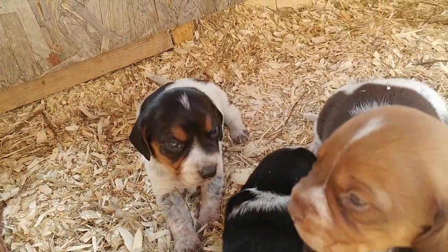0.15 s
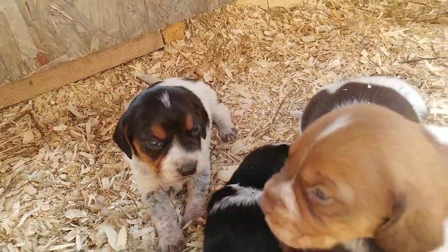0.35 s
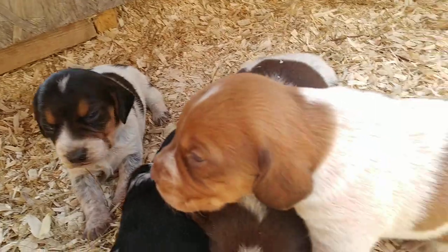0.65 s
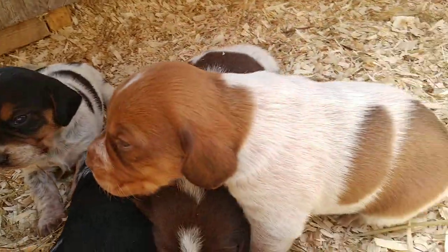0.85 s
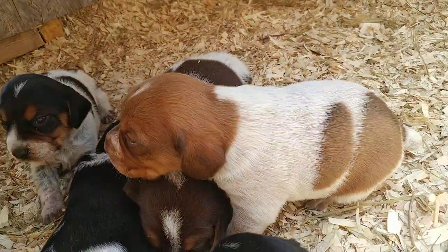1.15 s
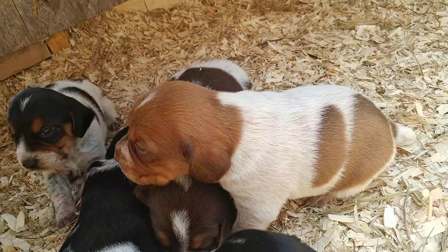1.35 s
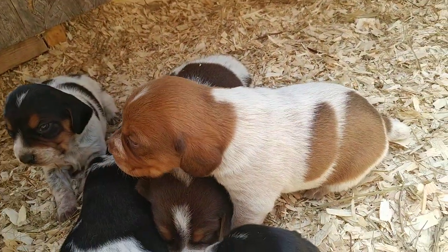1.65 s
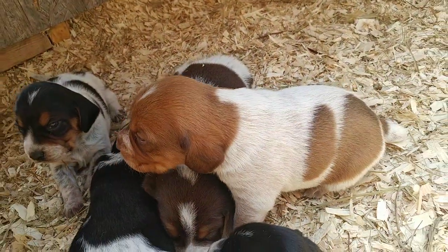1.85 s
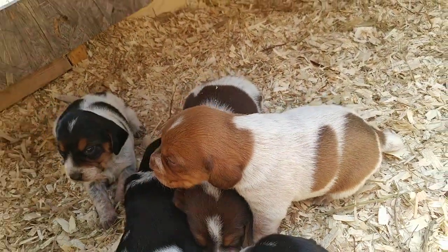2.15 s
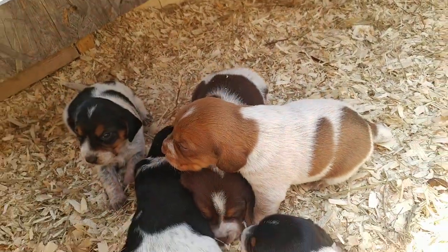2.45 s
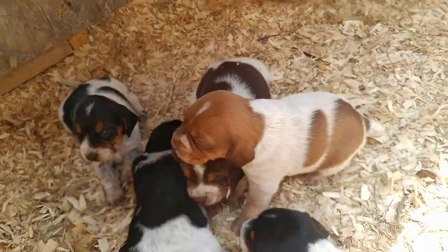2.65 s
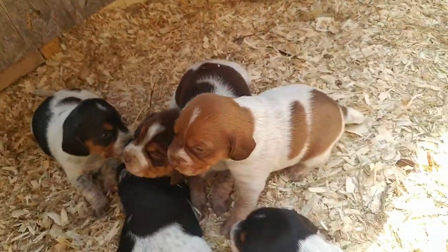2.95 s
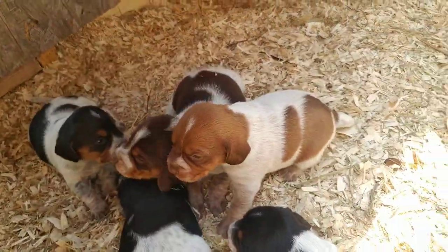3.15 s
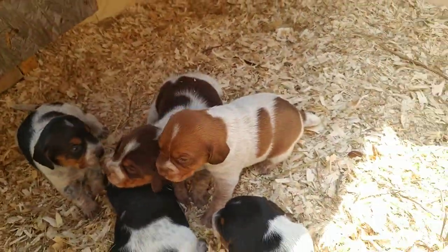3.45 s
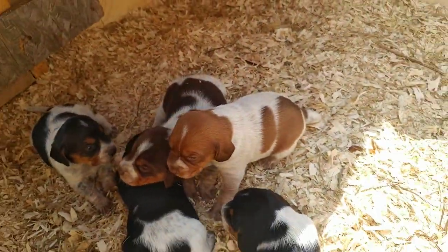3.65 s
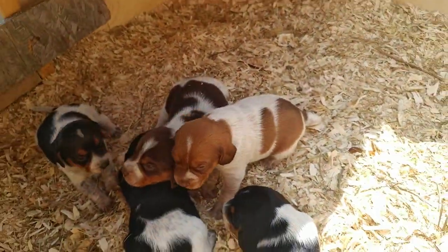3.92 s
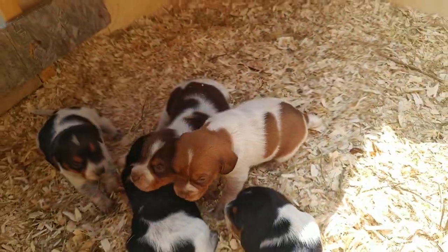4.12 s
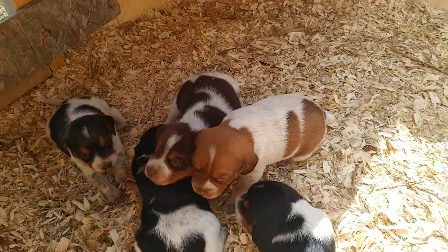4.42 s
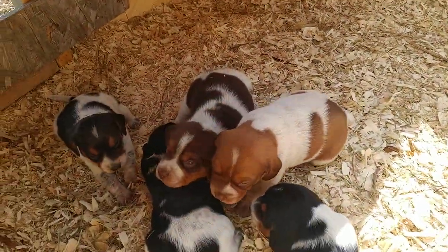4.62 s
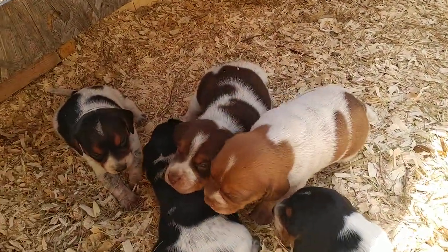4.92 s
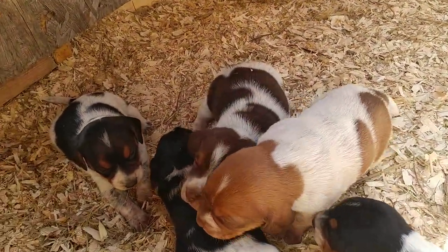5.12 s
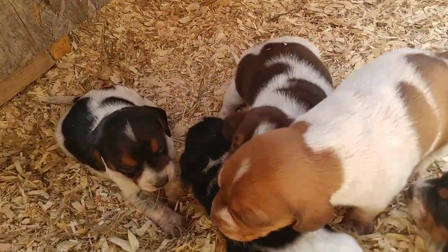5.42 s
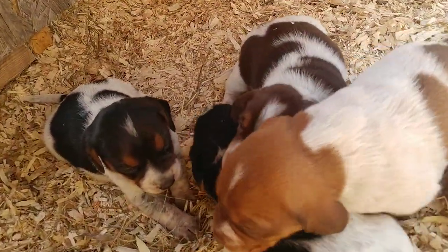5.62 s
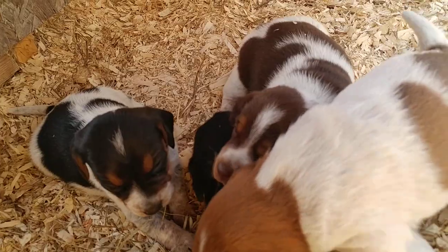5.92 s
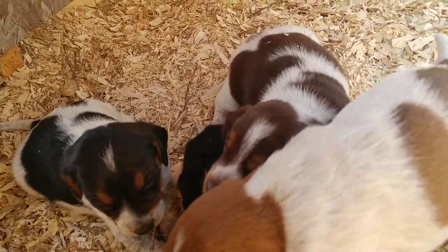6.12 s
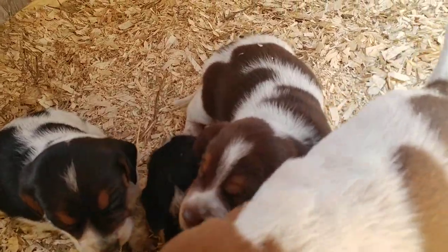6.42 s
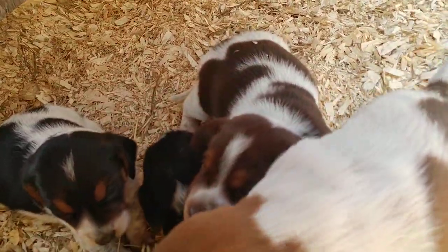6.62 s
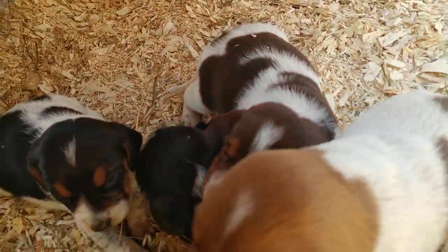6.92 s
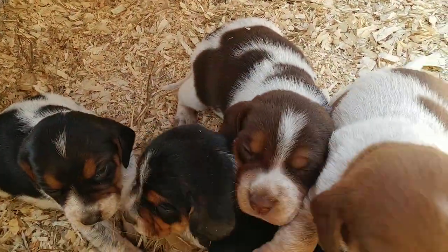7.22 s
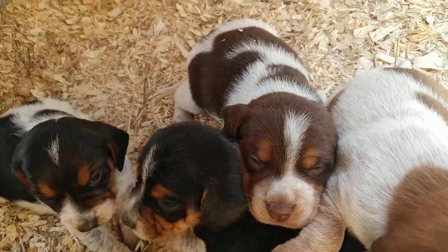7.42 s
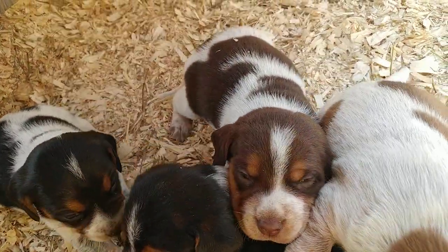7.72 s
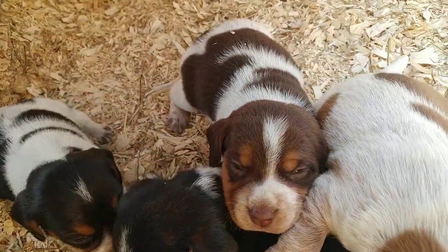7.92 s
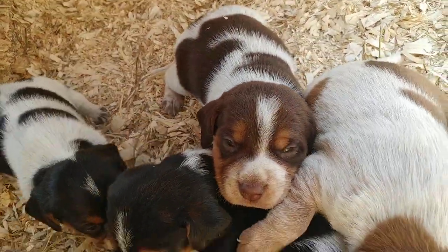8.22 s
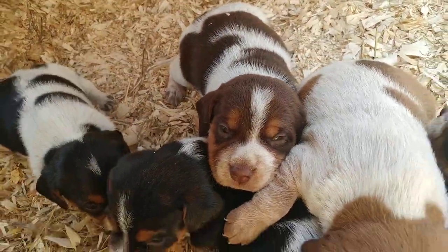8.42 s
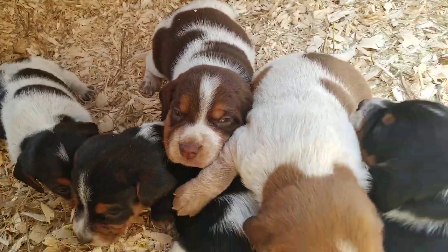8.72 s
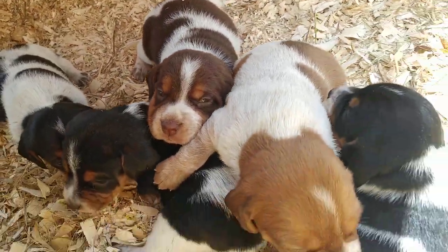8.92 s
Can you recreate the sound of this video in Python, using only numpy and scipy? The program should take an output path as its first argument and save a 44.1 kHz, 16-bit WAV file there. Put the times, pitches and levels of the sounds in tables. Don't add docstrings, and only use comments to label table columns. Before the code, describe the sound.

Small paws crunch and drag through dry, curly shavings in uneven strokes with little gaps, single curls cracking sharply and the pressed bedding crunching lower beneath. Bodies softly knock the wooden floor and walls. After a quieter stretch comes the heaviest scuffling and booming, mixed with high puppy whistles and mutters, then a few short yips and near stillness. Near, dry stereo pickup in a small box with faint hiss.

```python
import sys
import numpy as np
from scipy import signal
from scipy.fft import rfft, irfft, next_fast_len
from scipy.io import wavfile
from scipy.ndimage import uniform_filter1d, map_coordinates

SR = 44100
rng = np.random.default_rng(int(sys.argv[2]) if len(sys.argv) > 2 else 0)


def store_wav(level_fs):
    pcm = np.round(np.clip(np.atleast_2d(level_fs), -1, 1) * 32767)
    wavfile.write(sys.argv[1], SR, pcm.T.astype(np.int16))


def level_to_linear(level):
    exponent = np.asarray(level, float) / 20
    return 10 ** exponent


N = 399490

# start_s, length_s, first_db, last_db, bed_weight_db
PAW_LANDINGS = [(0.011, 0.046, -31.5, -29.5, -30.5), (0.329, 0.085, -51, -47.5, -40.5),
                (0.706, 0.041, -51.5, -53.5, -40), (0.764, 0.055, -46, -46.5, -39),
                (1.228, 0.025, -37, -33, -37), (1.294, 0.047, -35, -49.5, -36.5),
                (1.453, 0.055, -27.5, -30, -27), (1.586, 0.021, -27, -58, -29.5),
                (1.919, 0.067, -24, -29, -27), (2.153, 0.082, -33, -69, -39), (2.455, 0.035, -42, -44, -40),
                (2.596, 0.089, -31, -89.5, -48.5), (2.993, 0.02, -50, -49, -46),
                (3.28, 0.024, -34.5, -52.5, -40), (3.374, 0.07, -31.5, -24.5, -32),
                (3.686, 0.029, -67.5, -52, -56.5), (3.795, 0.0077, -25.5, -44, -49),
                (4.059, 0.075, -42, -36, -45.5), (4.193, 0.035, -24.5, -47, -39),
                (4.476, 0.049, -30.5, -48.5, -39.5), (4.672, 0.082, -36.5, -35.5, -36),
                (5.299, 0.049, -43, -31, -40), (5.616, 0.088, -37.5, -25, -37.5),
                (6.018, 0.012, -27, -23.5, -33), (6.032, 0.076, -15.5, -19, -21.5),
                (6.164, 0.088, -17.5, -22.5, -23.5), (6.539, 0.045, -35, -34, -37.5),
                (6.591, 0.041, -24, -17.5, -26), (6.757, 0.1, -16, -12, -26.5),
                (7.028, 0.038, -13, -42.5, -25), (7.222, 0.046, -53, -50, -47)]
# start_s, length_s, level_db, rise_s (per 30 dB), bed_weight_db
LIMB_DRAGS = [(0.19, 0.075, -39.5, 0.07, -35), (0.438, 0.095, -36, 0.08, -30),
              (1.05, 0.08, -19.5, 0.12, -18.5), (1.404, 0.008, -31, 0.04, -30),
              (2.09, 0.028, -35, 0.06, -32), (2.297, 0.016, -21, 0.03, -30), (2.74, 0.043, -36, 0.07, -33),
              (2.872, 0.008, -33, 0.03, -31), (3.04, 0.065, -36, 0.035, -36), (3.14, 0.05, -42, 0.08, -36),
              (3.5, 0.065, -28, 0.11, -32.5), (3.845, 0.12, -38.5, 0.05, -39), (4.3, 0.03, -25, 0.06, -38),
              (5.345, 0.105, -25.5, 0.03, -29), (6.272, 0.063, -27, 0.04, -29),
              (6.355, 0.08, -18.5, 0.09, -29), (7.295, 0.13, -25, 0.045, -33),
              (7.45, 0.09, -17, 0.05, -28.5), (7.58, 0.05, -52, 0.03, -52)]
# start_s, length_s, level_db, bed_weight_db
WEIGHT_SHIFTS = [(0.595, 0.0048, -41.5, -43), (2.274, 0.044, -29.5, -34), (4.997, 0.084, -50.5, -48),
                 (5.124, 0.039, -50.5, -41.5), (5.827, 0.099, -43.5, -41), (5.945, 0.063, -48.5, -47),
                 (6.651, 0.017, -30, -32), (7.85, 0.035, -56, -58.5), (6.48, 0.041, -47.5, -40.5),
                 (6.88, 0.03, -26.5, -37), (7.72, 0.18, -56.5, -60.5), (8.079, 0.038, -59.5, -60),
                 (8.398, 0.078, -58.5, -59), (8.776, 0.37, -61.5, -49.5)]
# time_s, level_db
CREEP = [(0, -52), (1.7, -61), (2.4, -52), (3.3, -56), (4.8, -53), (5.55, -60), (7.1, -52), (7.7, -62),
         (9.06, -68)]
# time_s, dryness_db (above 7 kHz), depth_db (below 450 Hz), body_db (below 3 kHz)
LITTER_COLOUR = [(0.0, -3.5, -3, -1.5), (0.6, -7, -8, -0.5), (1.1, 0, -2, 0.5), (1.5, -2.5, 4, 1.5),
                 (2.0, 1.5, 4.5, 0), (2.3, -4, 3, 2), (2.8, 2.5, 6, -1.5), (3.3, -1, 4.5, -1),
                 (3.8, -1.5, 2, 0), (4.3, -1.5, 8, 1.5), (4.8, 4.5, 6, 3), (5.3, 4, -10.5, 1.5),
                 (5.8, 5, -1, -3), (6.3, 0.2, -2, -0.5), (7.0, 6.5, 9.5, -1.5), (7.5, 2.5, -8, -2),
                 (7.8, 18, -2, -3), (9.0, 2.5, 0, -0.5)]
# time_s, left_lag_samples
BEARING = [(0, -6), (1, -10), (1.8, -18), (2.6, -1), (3.5, -20.5), (4.2, 6.5), (5.2, 10), (5.8, 6),
           (6.2, -19), (6.8, -10), (7.6, -12.5), (8.5, 8.5)]
# frequency_hz, level_db
CURL_SPECTRUM = [(500, -33), (1000, -6), (1600, -5.5), (3000, -0.6), (4500, 1.2), (6000, -1.2), (8000, 1.5),
                 (12000, -4), (16000, -12)]
# frequency_hz, level_db
BED_SPECTRUM = [(200, -17), (270, -10), (350, -4), (440, -8), (560, 0), (650, -1.5), (860, -4), (1050, -15),
                (1500, -35)]
# time_s, level_db
FLOOR_LOAD = [(0.0, -37), (1.5, -33.5), (1.82, -50), (1.92, -29), (2.5, -39), (5.35, -44.5), (5.55, -55.5),
              (5.63, -37.5), (5.98, -36), (6.05, -19.5), (6.55, -30), (6.68, -19.5), (7.1, -18.5),
              (7.25, -30.5), (7.7, -51), (9.05, -56.5)]
# frequency_hz, width_hz, level_db
FLOOR_MODES = [(55.6, 11, -3.5), (70.4, 7.7, 0), (90.3, 18.4, -1.5)]
# frequency_hz, width_hz, level_db
UPPER_MODES = [(165, 16.4, 4), (213, 42, -2.5)]
# start_s, peak_db, ring_hz
THIN_CRACKS = [(0.4399, -18, 3700), (0.5959, -31, 4540), (0.7602, -39, 5870), (1.025, -13, 2930),
               (1.2294, -26, 3210), (1.401, -15.5, 4260), (1.47, -16.5, 4480), (1.923, -15.5, 4560),
               (2.076, -18, 4370), (2.2943, -7.5, 2730), (2.4534, -32, 3850), (2.742, -19, 7860),
               (2.8699, -17, 7270), (2.9916, -42, 7670), (3.178, -25, 2490), (3.2206, -30, 2490),
               (3.4261, -11, 3200), (3.4979, -15, 7300), (4.0094, -44, 3140), (4.0228, -36, 4360),
               (4.088, -22, 1800), (4.1139, -26, 3890), (4.278, -18, 3800), (4.6917, -23, 1880),
               (5.3128, -24, 2400), (5.343, -15, 4320), (5.654, -10, 7160), (5.8311, -29, 5100),
               (6.594, -11.5, 3590), (6.6168, -7.5, 3700), (6.6644, -18.5, 2140), (6.7385, -15, 5940),
               (6.759, -7, 3400), (7.4181, -9, 3600), (7.4669, -3.5, 7570)]
# start_s, peak_db, ring_hz, knock_db
THICK_SNAPS = [(0.502, -23, 3600, -26.5), (1.296, -19, 3330, -14), (1.4086, -6.5, 4310, -18.5),
               (1.452, -17, 4240, -25), (1.5774, -15, 4480, -1), (1.908, -25.5, 4500, -1),
               (2.0925, -14, 2750, -5.5), (2.157, -17.5, 4410, -19), (2.2628, -28, 2730, -10),
               (2.3089, -0.5, 3670, -23), (2.591, -11.5, 5100, -10.5), (2.778, -14.5, 4420, -9),
               (3.0955, -7, 3640, -27.5), (3.273, -30.5, 5080, -6), (3.376, -17, 3290, -23),
               (3.7913, -19.5, 1600, -16), (4.1939, -10.5, 7930, -12), (4.2982, -10, 4080, -25),
               (4.4767, -17, 1540, -12.5), (4.673, -30, 1400, 5), (5.6168, -12.5, 1740, -11.5),
               (5.67, -9.5, 7070, -27), (6.0185, -11.5, 7500, -21.5), (6.0322, -7, 3010, -25),
               (6.156, -8, 4100, -12.5), (6.238, -6, 2430, -23), (6.5425, -18.5, 5140, -25.5),
               (6.7507, -15.5, 7700, -3.5), (7.0282, -4, 7820, -10.5), (7.4375, -8.5, 3160, -13.5)]
# start_s, peak_db, pitch_hz
WALL_TAPS = [(1.097, -26.5, 165), (1.519, -24, 165), (1.901, -26, 159.4), (3.687, -30, 169),
             (4.481, -34.5, 169), (4.666, -24, 172), (6.415, -21.5, 174), (6.614, -14.5, 210),
             (7.028, -12, 347)]
# start_s, peak_db
FLOOR_BUMPS = [(1.148, -13.5), (1.419, -17), (1.518, -15.5), (1.918, -18.5), (3.178, -24.5), (3.395, -19),
               (4.204, -20), (4.662, -24.5), (6.036, -9), (6.165, -2.5), (6.652, -11.5), (6.881, -3),
               (7.033, 3.5)]
# time_s, pitch_hz, level_db
YIPS = [
    [(5.878, 1106, -45), (5.886, 1230, -29), (5.894, 1258, -32), (5.906, 1140, -23), (5.916, 980, -32),
     (5.93, 940, -46)],
    [(7.567, 922, -28), (7.573, 843, -21), (7.609, 747, -19.5), (7.616, 837, -20.5), (7.626, 880, -17.5),
     (7.632, 873, -38.5), (7.655, 880, -51)],
    [(7.833, 1150, -26), (7.839, 851, -24), (7.87, 842, -19.5), (7.879, 875, -17.5), (7.889, 881, -38.5),
     (7.91, 866, -50)],
    [(8.047, 910, -55), (8.054, 856, -32.5), (8.059, 700, -28.5), (8.063, 640, -25), (8.071, 612, -26.5),
     (8.075, 592, -36), (8.09, 586, -64)],
]
# time_s, pitch_hz, level_db
MUTTERS = [
    [(6.065, 635, -26.5), (6.09, 627, -26.5), (6.105, 620, -22.5)],
    [(6.1, 890, -25.5), (6.112, 1000, -25.5), (6.13, 983, -29.5), (6.148, 830, -29.5)],
]
# time_s, pitch_hz, level_db, overtones_db
WHISTLES = [
    [(6.57, 1008, -24, -12), (6.59, 1260, -39, -8), (6.625, 1314, -40, -4), (6.655, 1276, -39, -8),
     (6.67, 1044, -23.5, -15.5)],
    [(6.885, 1425, -45.5, 3), (6.91, 1507, -32, 2), (6.95, 1700, -35.5, 1), (6.965, 1723, -28, -3),
     (6.985, 1620, -30, -4), (7.003, 1690, -31, -5), (7.03, 1604, -29.5, -5)],
    [(7.218, 1380, -45.5, 2.5), (7.232, 1304, -36.5, 1.5), (7.25, 1296, -34, 1.5), (7.28, 1503, -32.5, 2),
     (7.315, 1682, -23, -1), (7.335, 1630, -27.5, -5), (7.36, 1483, -28.5, -4), (7.385, 1232, -28, -6.5),
     (7.4, 975, -36, -9)],
]
# frequency_hz, level_db
MOUTH = [(600, 2), (900, -4), (1300, -15), (1800, -13), (2500, -26), (3500, -55), (5200, -33), (7000, -27),
         (10000, -23)]
# frequency_hz, level_db
NOSE = [(900, -2.5), (1800, -7.5), (2600, -12), (3400, -23), (5000, -17), (6700, -10), (8500, -8.5),
        (10500, -12), (13000, -35)]
# frequency_hz, t60_s
BOX_DECAY = [(300, 0.029), (2000, 0.061), (10000, 0.0043)]
# frequency_hz, level_db
LEFT_PORT = [(300, 1.5), (2000, 1), (6000, -1.5), (8450, -8), (8900, -17), (9450, -4), (10600, 3),
             (12500, -7), (16000, -11.5)]
# frequency_hz, level_db
RIGHT_PORT = [(300, -1), (2000, 0), (6000, 0), (8350, -5), (8900, -31.5), (10400, -16), (12500, -23.5),
              (16000, -22.5)]
# frequency_hz, level_db (per Hz)
AIR_SPECTRUM = [(24, -35.5), (40, -3), (101, 1), (185, -11), (243, -27), (570, -17.5), (2500, -35),
                (3300, -39), (5310, -41.5), (7730, -26.5), (8990, -18.5), (10400, -8.5), (16000, -21)]


def unit(x):
    return x / np.sqrt(np.mean(x ** 2) + 1e-20)


def along(points, hz):
    f, v = np.transpose(points)
    return np.interp(np.log(hz + 1), np.log(f + 1), v)


def curves(rows):
    s, *cols = np.transpose(rows)
    return [np.interp(np.arange(N) / SR, s, c) for c in cols]


def wobble(rate):
    n = np.arange(0, N + 16, 16)
    knots = rng.standard_normal(int(N * rate / SR) + 4)
    return np.interp(np.arange(N), n, map_coordinates(knots, [n * rate / SR]))


def filtered(x, response):
    m = next_fast_len(N + SR // 6)
    return irfft(rfft(x, m) * response(np.fft.rfftfreq(m, 1 / SR)), m)[..., :N]


def coloured(x, spectrum):
    return filtered(x, lambda hz: level_to_linear(along(spectrum, hz)))


def shaded(x, band, db):
    return x + (level_to_linear(db) - 1) * filtered(x, band)


def arriving(x, lag):
    n = np.arange(N)
    late = np.clip(n - np.round(lag).astype(int), 0, N - 1)
    return np.array([x[late], x])


def strokes_db(rows, rest_db):
    settle_db, settle_s = -30, 0.16
    t = np.arange(0, N, 32) / SR
    power = level_to_linear(2 * rest_db(t))
    for s, length, first_db, last_db, rise, fall in rows:
        end = s + length
        times = [s - 2 * rise, s, end, end + 2 * fall]
        stroke_db = np.interp(t, times, [first_db - 60, first_db, last_db, last_db - 60])
        settling_db = max(first_db, last_db) + settle_db
        power = power + level_to_linear(2 * stroke_db)
        power = power + (t > s) * level_to_linear(2 * settling_db - 60 * np.clip(t - end, 0, 9) / settle_s)
    return np.interp(np.arange(N) / SR, t, 10 * np.log10(power))


def paw_work():
    rows = [(s, n, a, b, 0.003, 0.049, w) for s, n, a, b, w in PAW_LANDINGS]
    rows += [(s, n, a, a, min(rise, 0.13), 0.045, w) for s, n, a, rise, w in LIMB_DRAGS]
    rows += [(s, n, a, a, 0.047, 0.032, w) for s, n, a, w in WEIGHT_SHIFTS]
    crush_db = strokes_db([row[:6] for row in rows], lambda t: np.interp(t, *np.transpose(CREEP)) - 6)
    pressed = [(s, n, w, w + 0.44 * (b - a), 1.42 * rise, 1.55 * fall) for s, n, a, b, rise, fall, w in rows]
    press_db = strokes_db(pressed, lambda t: -64 + 0 * t)
    return crush_db, press_db


def crackle(spiky_db, patchy_db):
    sizes_db = spiky_db * uniform_filter1d(rng.exponential(1, N), size=6)
    breaks = rng.standard_normal(N) * level_to_linear(sizes_db)
    z = signal.stft(breaks, nperseg=256)[2]
    field = uniform_filter1d(rng.standard_normal(z.shape), size=3, axis=0)
    field = uniform_filter1d(field, size=12, axis=1)
    return signal.istft(z * level_to_linear(patchy_db * unit(field)), nperseg=256)[1][:N]


def ticks(count, hz, cycles, spread_db):
    size, place, side = rng.random((3, count, 1))
    t = np.arange(128) / SR
    pitch = hz * np.exp(0.39 * rng.standard_normal((count, 1)))
    tones = np.exp(-t * pitch / cycles) * np.sin(2 * np.pi * np.clip(pitch, 2200, 15000) * t)
    tones = level_to_linear(np.minimum(-spread_db * np.log(size), 10)) * tones
    start = (place * N).astype(int) + np.arange(128)
    lag = np.interp(place * N / SR, *np.transpose(BEARING)) + 30 * (side - .5)
    ports = []
    for delay in (lag.astype(int), 0):
        heard = np.bincount((start + 64 + delay).ravel(), tones.ravel(), N + 512)
        ports.append(heard[64:N + 64])
    return unit(np.array(ports))


def shavings(crush_db, press_db):
    bearing, = curves(BEARING)
    dry_db, deep_db, body_db = curves(LITTER_COLOUR)
    paws = 0
    for offset in (-15., 1.5, 16.):
        crushing = level_to_linear(1.9 * wobble(40)) * crackle(spiky_db=5.5, patchy_db=5.2)
        paws = paws + arriving(crushing, bearing + 9 * wobble(4.4) + offset)
    flicks = ticks(count=6000, hz=4280, cycles=0.6, spread_db=2.0)
    curls = unit(coloured(unit(paws) + .5 * flicks, CURL_SPECTRUM))
    curls = shaded(curls, lambda hz: 1 / (1 + (7500 / (hz + 1)) ** 6), dry_db)
    curls = shaded(curls, lambda hz: 1 / (1 + (hz / 3000) ** 4), body_db)
    bed = arriving(crackle(spiky_db=4.5, patchy_db=3.6), 0.54 * bearing)
    bed = bed + coloured(rng.standard_normal((2, N)), [(300, -12), (600, -5), (1000, 3)])
    bed = shaded(unit(coloured(bed, BED_SPECTRUM)), lambda hz: 1 / (1 + (hz / 450) ** 8), deep_db)
    return level_to_linear(crush_db + 2.0) * curls + level_to_linear(press_db - 4.0) * bed


def ringing(x, modes, width_hz):
    def peak(f, centre, width):
        return 1j * f * width / (centre * centre - f * f + 1j * f * width)

    def response(f):
        panel = sum((-1) ** k * level_to_linear(db) * peak(f, c, w) for k, (c, w, db) in enumerate(modes))
        return peak(f, 1.0 * modes[0][0], width_hz) * panel
    return filtered(x, response)


def pushes(apart):
    return level_to_linear(2.5 * wobble(23)) * (rng.standard_normal(N) + apart * rng.standard_normal((2, N)))


def floor(press_db):
    load_db, = curves(FLOOR_LOAD)
    slow_db = uniform_filter1d(press_db, size=SR // 3)
    turns_db = uniform_filter1d(np.roll(press_db - slow_db, 700), size=1200)
    low_db = np.minimum(load_db + 0.35 * turns_db, -17)
    upper_db = (1 - 0.37) * load_db + 0.37 * slow_db + 0.45 * turns_db
    low = unit(ringing(pushes(apart=.15), FLOOR_MODES, width_hz=36))
    upper = unit(ringing(pushes(apart=0.42), UPPER_MODES, width_hz=42))
    return level_to_linear(low_db - 4) * low + level_to_linear(upper_db - 12.5) * upper


def snaps():
    click, knock = np.zeros(N + SR), np.zeros(N + SR)
    t = np.arange(SR // 14) / SR
    for s, db, hz, knock_db in THICK_SNAPS + [(s, db - 4, hz, -20) for s, db, hz in THIN_CRACKS]:
        i = round(s * SR)
        rough = 1 + 0.4 * uniform_filter1d(rng.standard_normal(len(t)), size=12)
        ring = 0.4 * level_to_linear(-60 * t / 0.028) * np.sin(2 * np.pi * hz * t) * rough
        crack_and_settling = 1.7 * level_to_linear(-60 * t / 0.004) + 0.36 * level_to_linear(-60 * t / 0.069)
        click[i:][:len(t)] += level_to_linear(db - 1.5) * (ring + crack_and_settling * rng.standard_normal(len(t)))
        thump = level_to_linear(db + knock_db + 16.0 - 60 * t / 0.043) * (1 - np.exp(-t / 0.0014))
        knock[i:][:len(t)] += thump * rng.standard_normal(len(t))
    both = coloured(click[:N], CURL_SPECTRUM) + coloured(knock[:N], BED_SPECTRUM)
    return arriving(both, curves(BEARING)[0])


def bumps():
    out, t = np.zeros(N), np.arange(SR // 3) / SR
    hits = [(s, db, 77, 0.11) for s, db in FLOOR_BUMPS]  # Hz, t60 in s
    hits += [(s, db, hz, 30.5 / hz) for s, db, hz in WALL_TAPS]
    for s, db, hz, t60 in hits:
        swell = 1 - np.exp(-t / 0.0056)
        out[round(s * SR):][:len(t)] += level_to_linear(db - 60 * t / t60) * swell * np.sin(2 * np.pi * hz * t)
    return out


def voices(calls, overtones, fade, jitter, thinning, breath):
    out, waver = np.zeros(N), wobble(220)
    k = np.arange(1, 13)[:, None]
    for call in calls:
        s, pitch, db, *bright_db = np.transpose(call)
        t = np.arange(s[0], s[-1], 1 / SR)
        i = round(s[0] * SR)
        level_db = np.interp(t, s, db)
        glide = uniform_filter1d(np.interp(t, s, pitch), size=200, mode="nearest")
        hz = glide * (1 + jitter * waver[i:][:len(t)])
        effort_db = thinning * (level_db - db.max())
        effort_db = effort_db + sum(np.interp(t, s, b) for b in bright_db)
        puffs = uniform_filter1d(rng.standard_normal((len(k), len(t))), size=24, axis=1)
        air = 1 + breath * (k - 1) * unit(puffs)
        harmonic_db = along(overtones, k * hz) - along(overtones, hz) + (k > 1) * effort_db
        harmonics = air * level_to_linear(harmonic_db) * np.sin(2 * np.pi * k * np.cumsum(hz) / SR)
        edges = np.clip(np.minimum(t - s[0], s[-1] - t) / fade, 0, 1)
        out[i:][:len(t)] += level_to_linear(level_db + 3.5) * edges * np.sum(harmonics, axis=0)
    return out


def yips_and_mutters():
    cries = voices(YIPS + MUTTERS, MOUTH, fade=0.0021, jitter=0.0086, thinning=0.3, breath=.08)
    return arriving(cries, 4.8) * level_to_linear([[-1.5], [1.5]])


def whistles():
    return arriving(voices(WHISTLES, NOSE, fade=0.006, jitter=0.004, thinning=0, breath=.07), -6.5)


def box(x):
    hz, t, z = signal.stft(rng.standard_normal((2, SR // 6)), SR, nperseg=128)
    tail = signal.istft(z * level_to_linear(-60 * t / along(BOX_DECAY, hz)[:, None]), SR, nperseg=128)[1]
    return signal.fftconvolve(x, tail / np.linalg.norm(tail[0]), axes=1)[:, :N]


def scene():
    crush_db, press_db = paw_work()
    litter = level_to_linear(1.2) * shavings(crush_db, press_db)
    boom = floor(press_db) + bumps()
    sharp = snaps()
    calls = yips_and_mutters() + whistles()
    return litter + boom + sharp + calls + level_to_linear(-7) * box(sharp + 0.9 * calls)


def roll_off(x):
    return signal.sosfilt(signal.butter(12, 16810, fs=SR, output="sos"), x)


def record(dry):
    ports = filtered(dry, lambda hz: level_to_linear([along(LEFT_PORT, hz), along(RIGHT_PORT, hz)]))
    hiss = rng.standard_normal((2, N)) + 0.49 * rng.standard_normal(N)
    ports = ports + level_to_linear(-64) * unit(coloured(hiss, AIR_SPECTRUM))
    held = ports / (1 + np.abs(ports / .8) ** 6) ** (1 / 6)
    mix = coloured(held, [(25, -21.5), (40, -8.5), (55, 3), (16000, -1.5), (17000, -58.5)])
    return roll_off(mix)


dry = scene()
out = record(dry)
store_wav(out)
```